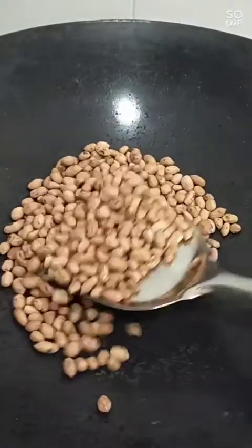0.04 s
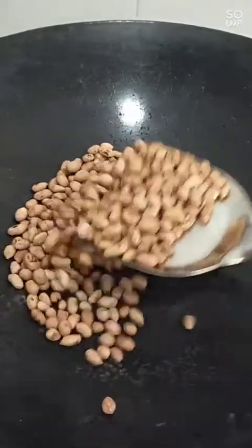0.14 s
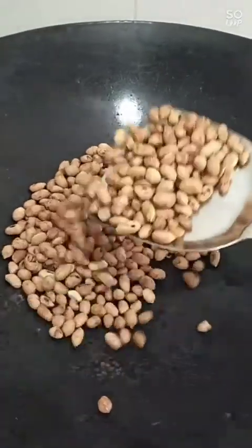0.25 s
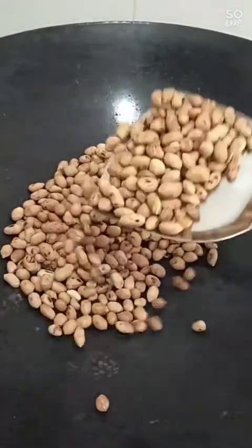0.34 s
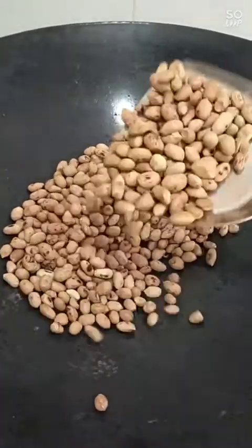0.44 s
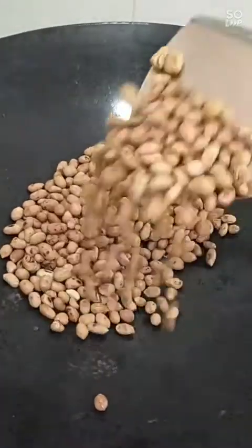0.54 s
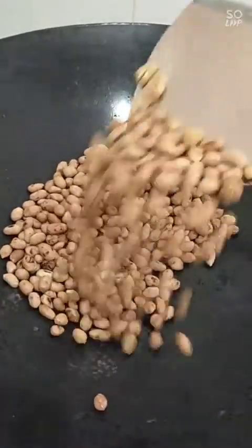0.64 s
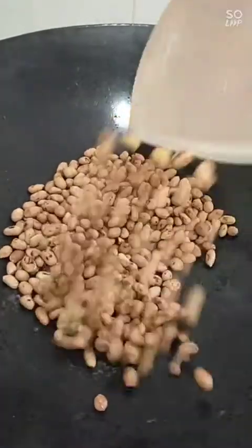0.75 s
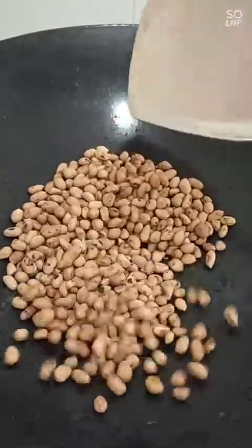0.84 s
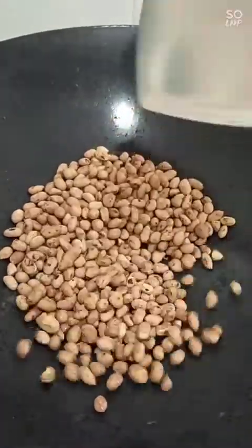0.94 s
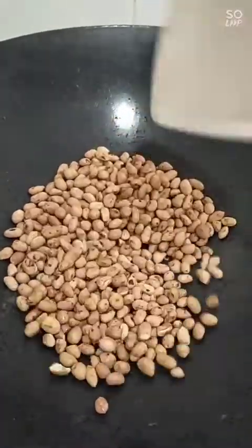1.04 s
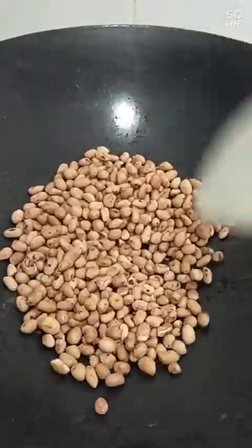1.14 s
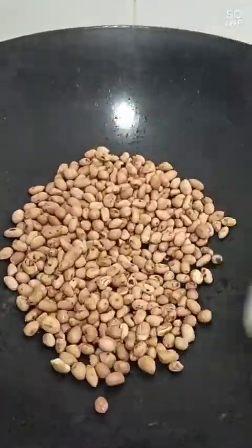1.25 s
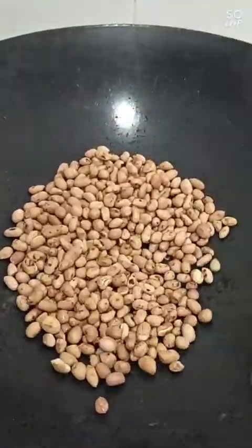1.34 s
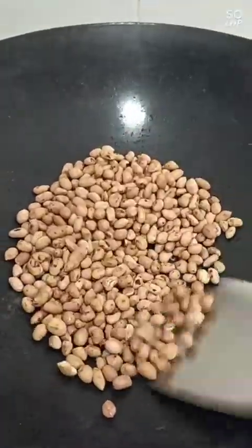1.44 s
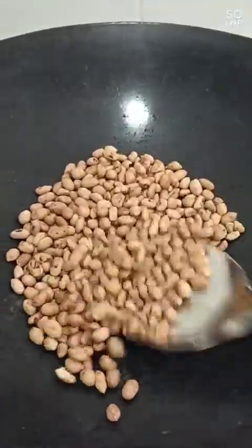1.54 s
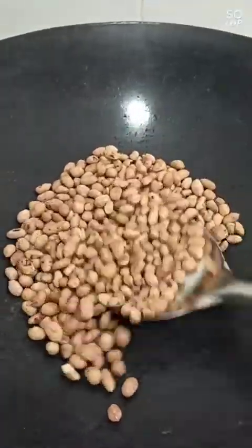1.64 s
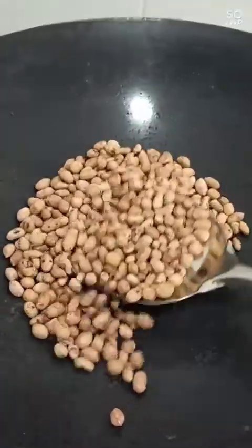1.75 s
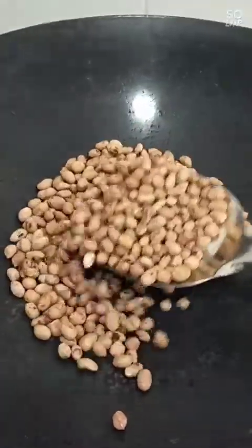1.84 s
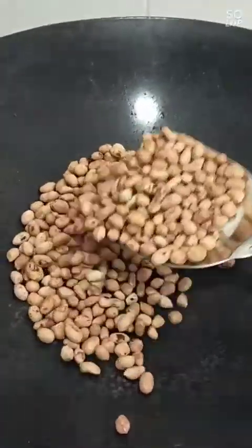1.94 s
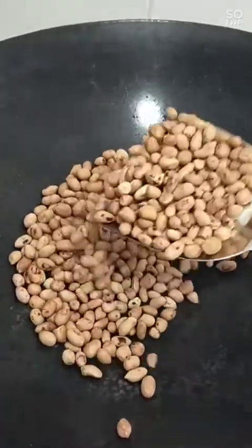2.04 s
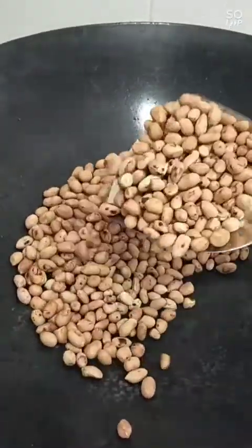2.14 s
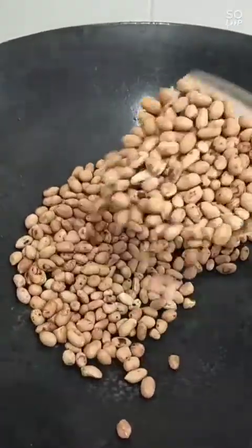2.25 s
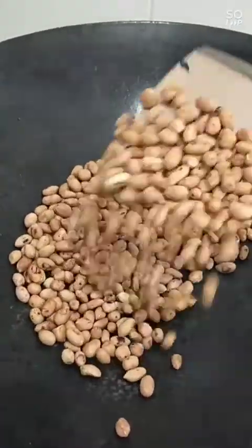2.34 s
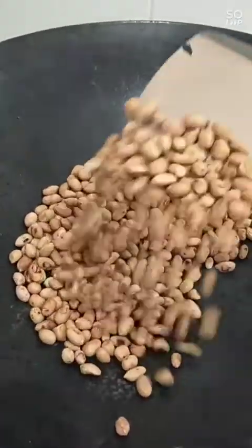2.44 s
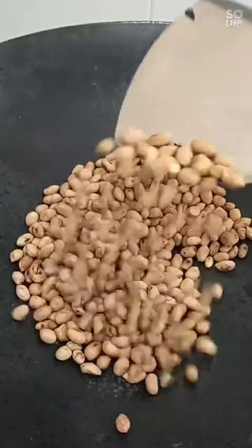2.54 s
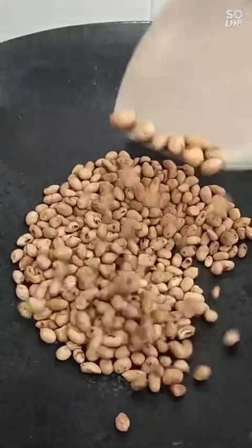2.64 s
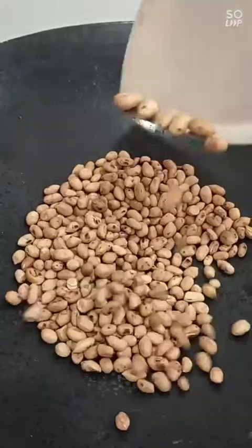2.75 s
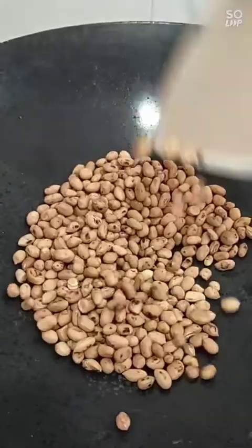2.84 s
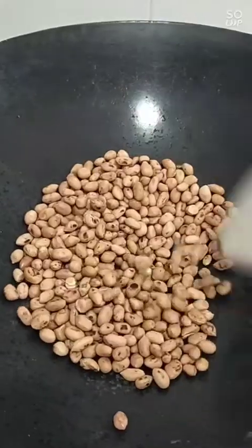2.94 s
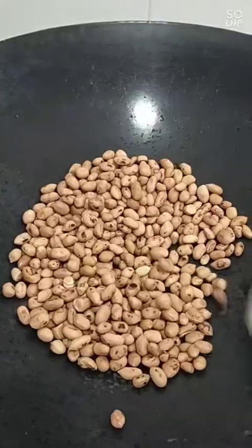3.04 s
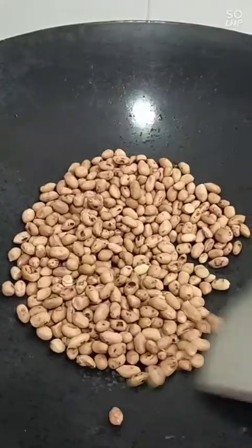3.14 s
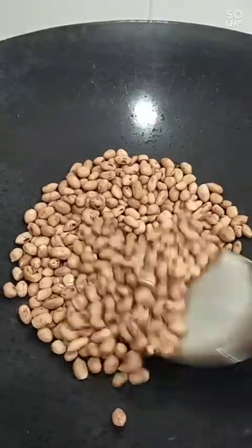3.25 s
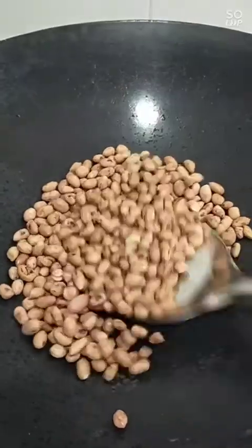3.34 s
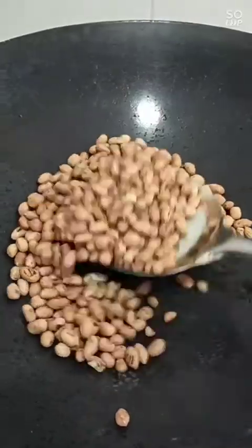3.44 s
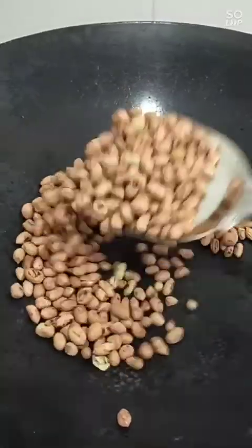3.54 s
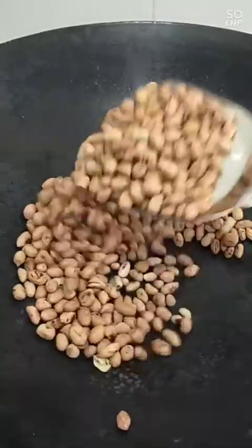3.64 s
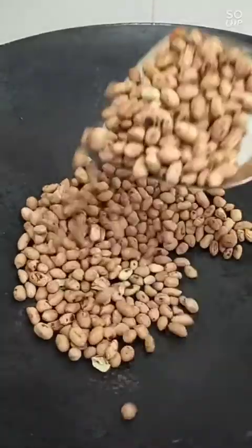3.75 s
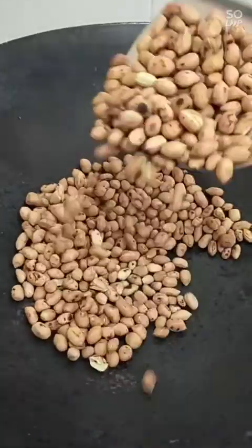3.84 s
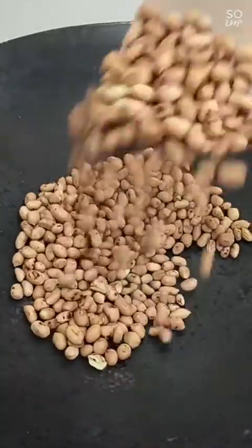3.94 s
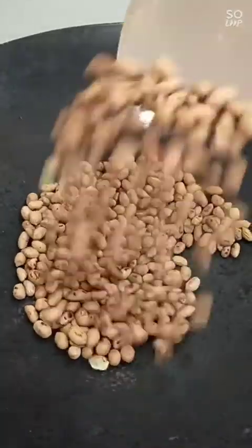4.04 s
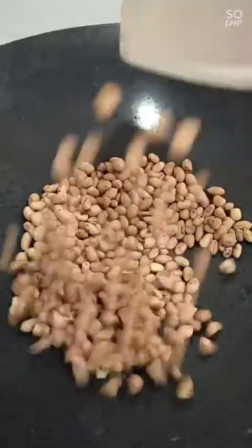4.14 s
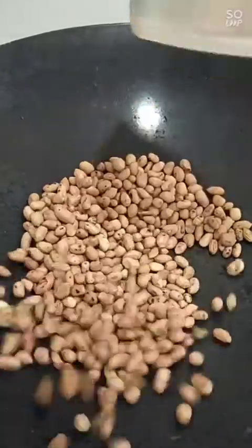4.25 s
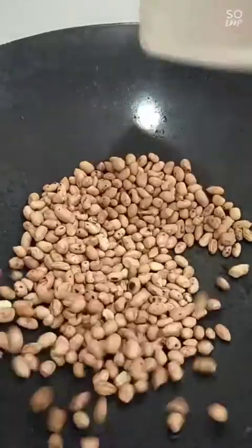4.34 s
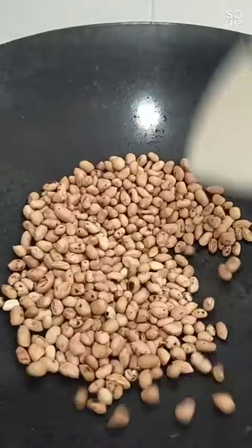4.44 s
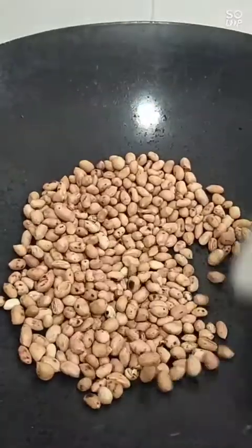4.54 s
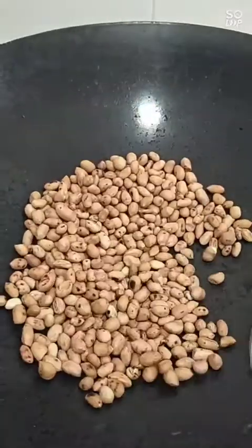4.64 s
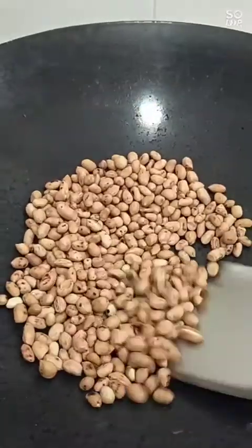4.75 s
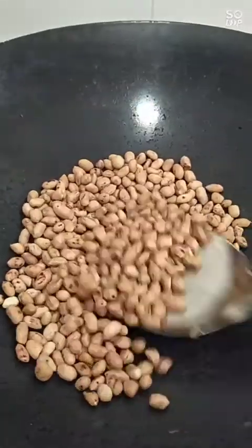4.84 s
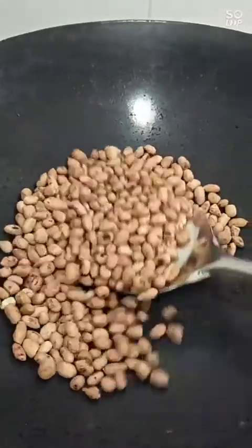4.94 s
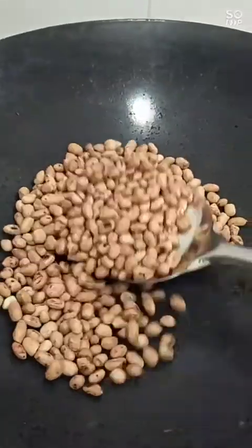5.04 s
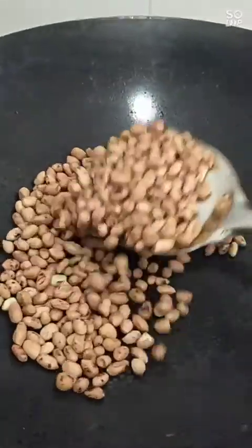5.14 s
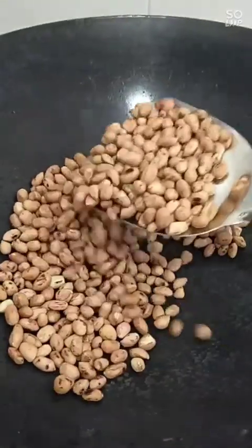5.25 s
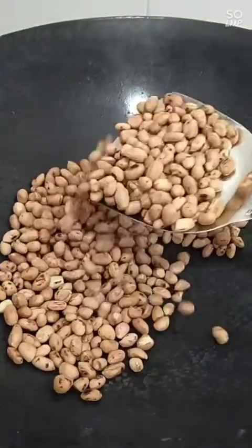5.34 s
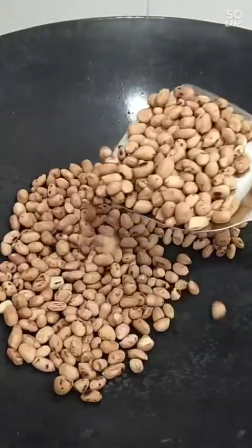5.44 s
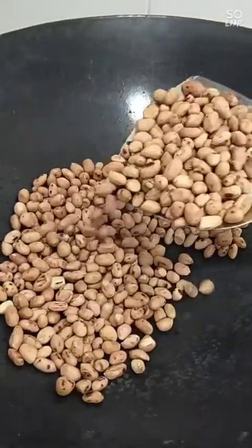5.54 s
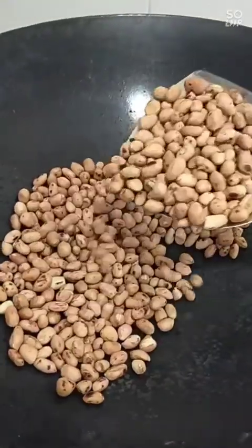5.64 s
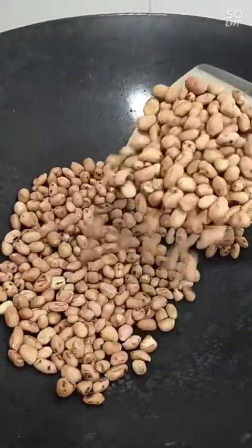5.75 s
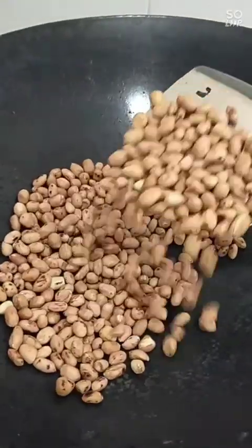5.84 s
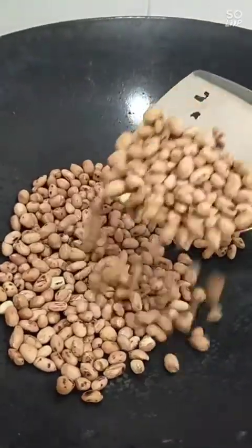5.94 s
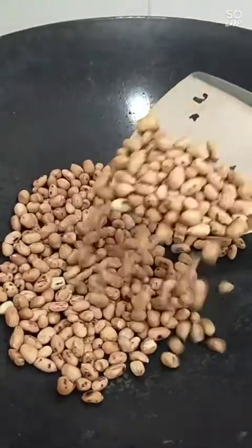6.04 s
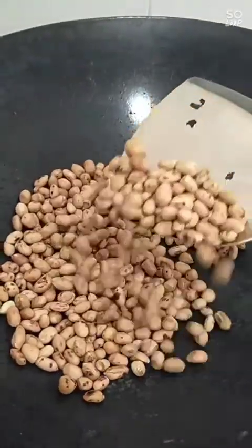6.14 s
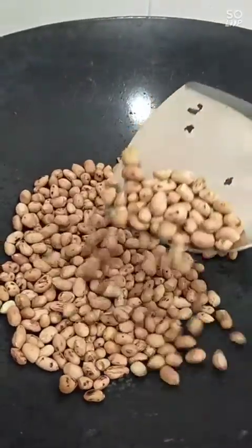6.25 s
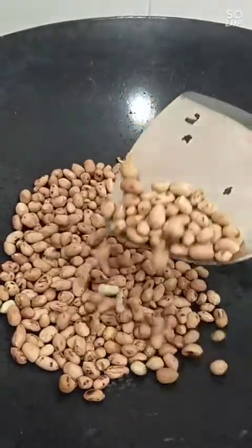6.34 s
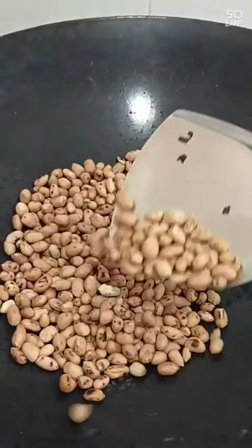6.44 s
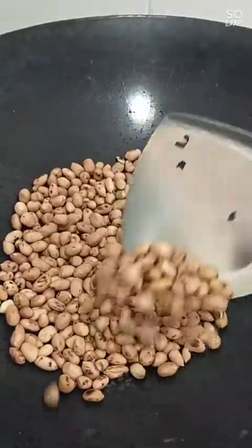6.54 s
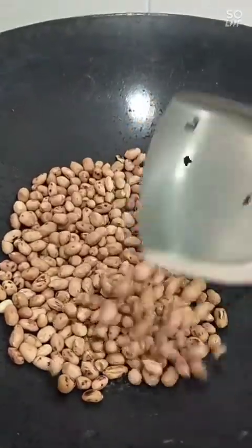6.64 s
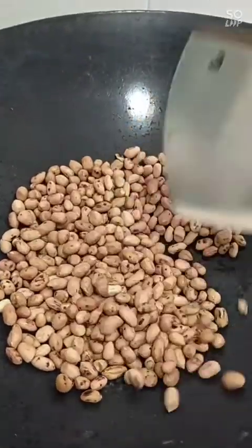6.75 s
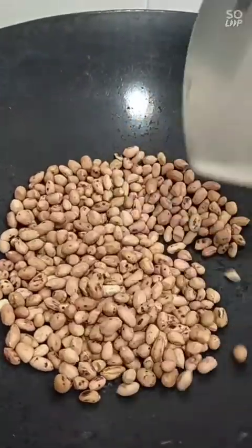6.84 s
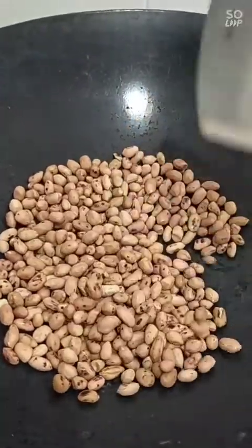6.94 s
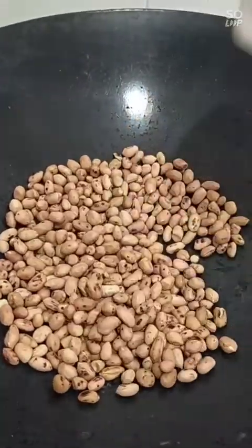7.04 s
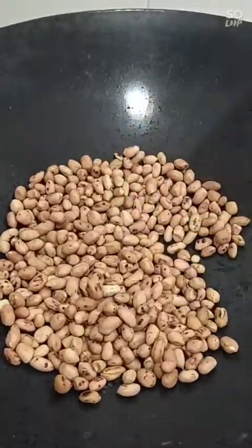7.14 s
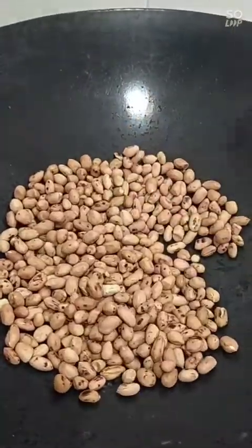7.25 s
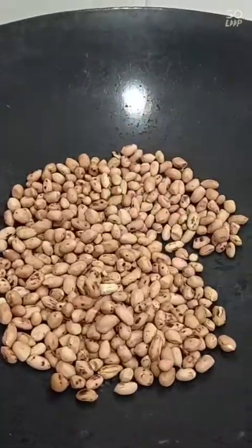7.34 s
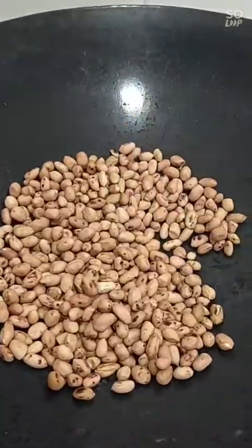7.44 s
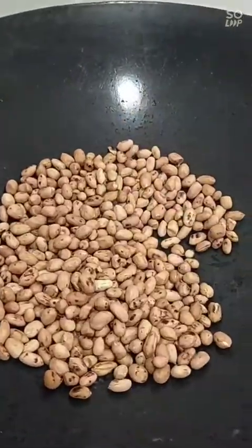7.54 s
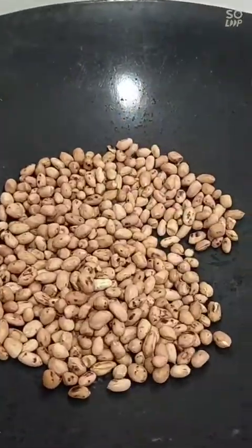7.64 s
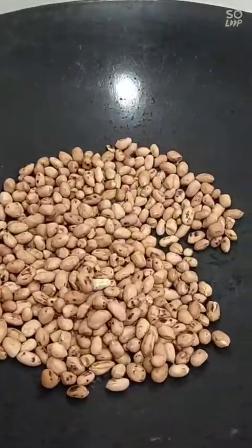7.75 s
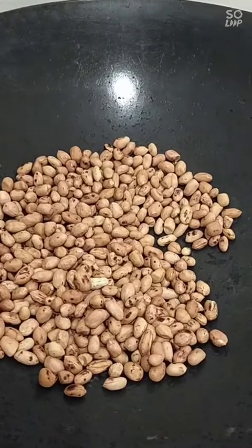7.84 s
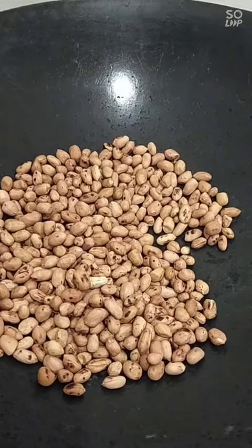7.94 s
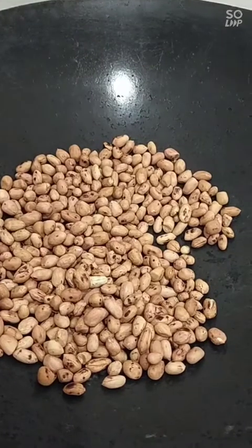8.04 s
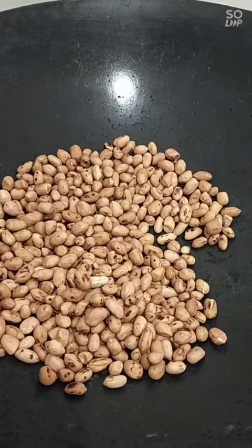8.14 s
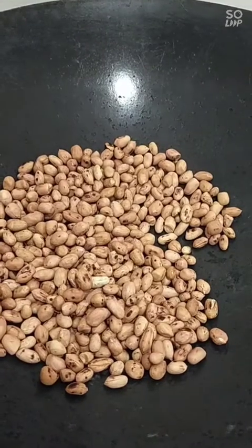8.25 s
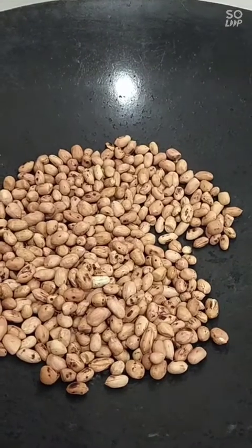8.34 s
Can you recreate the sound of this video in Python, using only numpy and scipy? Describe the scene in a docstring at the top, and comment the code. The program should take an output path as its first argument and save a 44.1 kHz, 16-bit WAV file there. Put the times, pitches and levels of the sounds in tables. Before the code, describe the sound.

A sharp, bright pop opens the sound, close up in a hard, echoing kitchen. Peanuts tick lightly in a steel wok as a spatula lifts them, with a faint metallic ring; at 0.5-0.85 s they rattle down onto the steel. Short gritty scrapes come at 1.3-1.55 s, then another pouring clatter around 2.3-2.6 s. A harder knock and longer scrape fill 3.05-3.3 s, a dense shower of nuts falls at 4.0-4.25 s, and the blade knocks and scrapes again at 4.6-4.85 s. Crisp pops crackle irregularly throughout, clustering at 4.4-4.7 s. A low microphone bump lands at 5.4 s. A softer, longer spill runs 5.8-6.4 s, with a last small clatter at 6.6 s. Then stirring stops and frequent dry pops continue to the end at about 8.4 s, some briefly ducking the level. Soft low thuds, roughly every 0.4 s, and faint air noise lie beneath.

```python
"""A sharp pop opens the scene: hot peanuts in a steel wok, close to a small microphone in a hard-walled kitchen.
Bursting skins are tiny scraps of noise; tumbling nuts are random blows that tick and set the steel ringing.
A spatula hisses as it scrapes (dense tiny slips) and sings when knocked (fading tones).
Behind them lie soft low thuds (dull noise), the echoing kitchen (a dying noise tail) and faint air noise.
The whole level dips now and then for about a tenth of a second, mostly around a pop."""
import sys
import numpy as np
from scipy import signal
from scipy.fft import rfft, irfft
from scipy.io import wavfile
from scipy.ndimage import uniform_filter1d

SR = 44100
rng = np.random.default_rng(int(sys.argv[2]) if len(sys.argv) > 2 else 0)


def generate_wav(signal):
    """Clip the signal to [-1, 1] and save it as 16-bit WAV at the path in sys.argv[1]."""
    frames = np.transpose(np.atleast_2d(signal))
    scaled = np.clip(frames, -1, 1) * 32767
    pcm = np.round(scaled).astype(np.int16)
    wavfile.write(sys.argv[1], SR, pcm)


N = 369999  # length of the scene in samples

# Levels in the tables are relative: mixing gains, filters and the room come on top.

# skins bursting: (time [s], level of the snap [dB], level of the nut's body against the snap [dB])
POPS = [(0.0094, -24.5, -25), (0.45, -36, -27), (0.854, -25, -21.5), (0.9762, -29.5, -26),
        (1.037, -23, -24.5), (1.3003, -27.5, -18.5), (1.6596, -33, -20.5), (2.0722, -43, -22),
        (2.1057, -21, -23.5), (2.6907, -37, -14), (3.0691, -22, -13.5), (3.1585, -19.5, -31),
        (3.284, -19.5, -14), (3.7584, -34.5, -23), (3.883, -33.5, -15), (4.2019, -23.5, -13.5),
        (4.4284, -21.5, -24.5), (4.4463, -21, -28), (4.5403, -17, -23), (4.616, -28, -21),
        (4.672, -27.5, -22), (4.707, -35, -18.5), (5.3867, -20, -25), (5.5188, -26, -30),
        (5.6342, -45.5, -14), (5.7554, -19, -21.5), (5.8642, -23, -18), (5.995, -35, -16),
        (6.57, -22.5, -20), (6.6422, -23, -24), (6.7427, -23, -26), (6.8503, -17, -20),
        (6.9733, -24.5, -27.5), (7.0598, -47, -12.5), (7.1301, -27, -20.5), (7.2247, -20.5, -23.5),
        (7.2706, -19.5, -23.5), (7.4645, -34.5, -17.5), (7.637, -18.5, -26), (7.66, -32, -18),
        (7.695, -36, -20.5), (7.759, -23.5, -26), (7.9342, -19.5, -24.5), (8.081, -26.5, -15.5),
        (8.1542, -17, -26.5), (8.2412, -24.5, -21.5), (8.248, -43.5, 0), (8.2549, -28, -23),
        (8.349, -41, -22.5)]
# echoes from the bowl, then the near wall: (delay [s], level [dB])
ECHOES = [(.0011, -9), (0.0028, -7), (0.013, -10.5), (0.0094, -17)]
# tone colour of the snap: (frequency [Hz], level [dB])
SNAP_COLOUR = [(1500, -66), (4500, -23.5), (8000, -8.5), (10500, -5), (12500, -4.5), (14000, 4.5),
               (15300, 8.5), (17000, -9.5)]
# tone colour of the nut's body: (frequency [Hz], level [dB])
NUT_COLOUR = [(200, -24), (1000, -12.5), (1700, -14.5), (2500, 4.5), (3900, -7), (6000, -9.5), (17000, -54)]
LAG_S = .001  # each burst comes this long after its time in the table
WALLS_DB = -8  # share of each pop sent to the walls


def pops():
    """A skin tears within about a millisecond: a bright snap and a duller body; far walls get plain coloured clicks."""
    s, db, body_db = np.transpose(POPS)
    snaps = np.c_[s + LAG_S, db + 6]
    bodies = np.c_[s + LAG_S, db + body_db + 20]
    snap = bursts(snaps, decay_s=0.00012, length=64, lead=5.0)
    body = bursts(bodies, decay_s=.0003, length=64, lead=2.17)
    for echo in ECHOES:  # uneven surfaces scatter each echo into a new shape
        snap += bursts(snaps + echo, decay_s=0.00023, length=96, lead=1.6)
        body += from_db(-6) * bursts(bodies + echo, decay_s=0.00059, length=96)
    near = colour(snap, SNAP_COLOUR) + colour(body, NUT_COLOUR)
    far = colour(clicks(snaps, extra_db=WALLS_DB), SNAP_COLOUR)
    far += from_db(-8) * colour(clicks(bodies, extra_db=WALLS_DB), NUT_COLOUR)
    return near, far


# the heap tumbles when scooped, carried or poured: (time of full strength [s], hold [s], rattle level [dB],
# build-up [dB/s], fall of the rattle [dB/s], level of the spatula's ring [dB])
TUMBLES = [(0.179, 0.011, -63, 86, 87, -61), (0.701, 0.056, -47, 131, 103, -84),
           (1.395, 0.04, -53.5, 250, 94, -66), (1.514, 0.044, -48.5, 154, 96, -59),
           (1.86, 0.11, -65, 100, 99, -65), (2.426, 0.043, -53, 162, 92, -77),
           (2.587, 0.08, -61, 100, 82, -73), (3.064, 0.071, -53.5, 396, 80, -77),
           (3.227, 0.05, -52, 78, 63, -55.5), (3.665, 0.016, -60, 64, 75, -64.5),
           (4.06, 0.039, -53.5, 248.5, 101, -79.5), (4.153, 0.061, -46.5, 102.5, 128, -76),
           (4.762, 0.075, -48.5, 235, 107, -51.5), (5.09, 0.21, -64, 58, 81, -75),
           (5.942, 0.39, -62.5, 80, 86, -80), (6.643, 0.017, -55.5, 190, 203, -92)]
# single nuts and clumps landing on steel: (time [s], level [dB])
LANDINGS = [(0.188, -59), (0.5243, -38.5), (0.5826, -28), (0.7118, -30), (0.7726, -37), (0.8435, -39),
            (1.3882, -39), (1.4062, -31), (1.4345, -35), (1.5174, -29.5), (1.567, -35.5), (1.8642, -45),
            (2.1902, -41.5), (2.2952, -36), (2.402, -27.5), (2.4455, -27.5), (2.5187, -32), (2.989, -36),
            (3.0574, -26.5), (3.1774, -26.5), (3.2515, -32), (3.5913, -41), (3.6486, -40), (3.8445, -41.5),
            (4.0163, -30.5), (4.1363, -39), (4.2314, -27.5), (4.3979, -42), (4.6331, -35), (4.7451, -30),
            (5.1057, -41), (5.827, -41.5), (5.9035, -32), (5.9594, -42), (6.0721, -37.5), (6.1218, -37),
            (6.2367, -37.5), (6.354, -33), (6.5928, -33)]
# ringing tones of the wok: (frequency [Hz], level [dB], time to fade by 60 dB [s])
WOK_MODES = [(2755, -11, .06), (3000, -14, .03), (3270, -2, .08), (3310, -1, .085), (3385, -3, .07),
             (3450, -5, .06), (3533, -5, .06), (3610, -3, .09), (3667, -4, .07), (3751, -5, .08),
             (3817, -7, .07), (3946, -8, .07), (4139, -15, .06), (4610, -19, .06)]
# ringing tones of the bowl: (frequency [Hz], level [dB], time to fade by 60 dB [s])
BOWL_MODES = [(492, -0.66, 0.042), (560, -0.7, 0.071), (646, -1.3, 0.088), (740, -1.1, 0.063),
              (887, -0.39, 0.041), (1040, 1, 0.032), (1221, -2.3, 0.04)]
# ringing tones of the spatula, also used by scrape and knocks:
# (frequency [Hz], level [dB], time to fade by 60 dB [s])
SPATULA_MODES = [(1242, 0, 0.23), (2359, -0.5, 0.048), (2400, -2.5, 0.052), (2680, -25, 0.035),
                 (4580, -11, .05), (5330, -8.5, 0.14), (5810, -7, 0.075), (6270, -7, 0.073),
                 (7680, -10, 0.025), (8320, -4.5, 0.034), (14600, -13, .006)]
# tone colour of nuts ticking: (frequency [Hz], level [dB])
TICK_COLOUR = [(300, -15), (1500, -36.5), (2300, 4), (3400, 1.5), (5500, -17), (8000, -18.5), (11500, -25),
               (15000, -8.5), (17000, -61)]
STILL_DB = -104.5  # rattle of the heap at rest
# drumming of the bowl at a rattle of -48.5 dB; share of the rattle's swing (in dB) that it follows
BOWL_DB, BOWL_FOLLOWS = -63, 0.5
BLADE_DAMPING = 1.44  # the spatula's ring falls this many times faster than the rattle
CLUMPING_DB = 2.0  # nuts move in clumps, so the rattle flickers
CONTACT_HZ = 5000  # a nut is soft: its blow on steel is dull above this


def nuts():
    """Tumbling nuts tick against each other and set the wok, the bowl and the loaded spatula ringing."""
    start, hold, db, rise, fall, blade_db = np.transpose(TUMBLES)
    rattle = swells(start, hold, db, rise, fall) + from_db(STILL_DB)
    spatula = swells(start, hold, blade_db, rise, BLADE_DAMPING * fall)
    bowl = from_db(BOWL_DB) * (rattle / from_db(-48.5)) ** BOWL_FOLLOWS
    rattle = rattle * flutter(depth_db=CLUMPING_DB, step=500)

    touches = grains(per_s=700., spread_db=5.0)
    ticks = grains(per_s=2000., spread_db=4.5)
    landed = clicks(LANDINGS)

    struck = from_db(-24.5) * ring(touches * rattle, WOK_MODES, spread_db=4.5)
    struck += from_db(-9.5) * ring(landed, WOK_MODES, spread_db=0.5)
    soft_blow = signal.butter(2, [1500, CONTACT_HZ], "band", fs=SR, output="sos")
    wok = signal.sosfilt(soft_blow, struck)

    landing_noise = bursts(LANDINGS, decay_s=0.0081, length=600)
    ticking = colour(from_db(-4.5) * ticks * rattle + from_db(3.5) * landing_noise, TICK_COLOUR)

    blade_touches = from_db(-19.5) * grains(per_s=1500., spread_db=4.0) * spatula
    # soft nuts reach only lower modes of the blade
    blade = ring(blade_touches, SPATULA_MODES[1:4], spread_db=3.0)
    drum = from_db(-28.5) * ring(touches * bowl + from_db(-5.0) * landed, BOWL_MODES, spread_db=5.0)
    return wok + ticking + blade + drum + from_db(-22) * clacks(rattle)


def clacks(rattle):
    """Nut on nut: lone dry clacks, each briefly ringing at one of ten pitches."""
    hits = grains(per_s=300., spread_db=3.0) * rattle
    dealt = rng.integers(0, 10, N)  # which pitch each hit gets
    out = np.zeros(N)
    for k, hz in enumerate(np.geomspace(2000, 4600, 10)):
        out += ring(hits * (dealt == k), [(hz, 0, 23.0 / hz)], spread_db=1.0)
    return out


# the steel edge bites or slides on steel: (time [s], hold [s], hiss level [dB])
SLIDES = [(0.016, 0.0016, -65.5), (0.108, 0.0052, -67), (1.305, 0.0046, -55), (1.386, 0.1, -56),
          (1.513, 0.035, -48), (3.054, 0.012, -49), (3.1, 0.19, -52.5), (4.621, 0.009, -51.5),
          (4.744, 0.11, -49)]
# tone colour of the scraping hiss: (frequency [Hz], level [dB])
HISS_COLOUR = [(1600, -19), (2500, 6.5), (4000, 5), (5400, -13), (7900, -8), (11600, -10.5), (15000, 5.5),
               (15800, -4), (16300, -37)]
BITE_DB_PER_S, LET_GO_DB_PER_S = 5993, 300


def scrape():
    """Dense slips of the edge hiss, catch and let go in each stroke, and stir the upper modes of the blade."""
    press = swells(*np.transpose(SLIDES), BITE_DB_PER_S, LET_GO_DB_PER_S)
    catching = flutter(depth_db=3.5, step=300)
    sliding = press > 2e-5  # silent under the lightest pressure
    slips = grains(per_s=9000., spread_db=3.0) * catching * press * sliding
    hiss = from_db(5) * colour(slips, HISS_COLOUR)
    return hiss + from_db(-36.0) * ring(slips, SPATULA_MODES[4:], spread_db=5.5)


# the spatula knocks the steel and sings: (time [s], level [dB], lowest mode against that level [dB])
KNOCKS = [(0.19, -52.5, -10), (0.4685, -57, -0.5), (0.525, -52, -10), (1.3117, -46.5, -20),
          (1.8612, -57.5, -10), (2.19, -59, -19), (2.309, -50, -13), (2.3608, -58.5, -4), (3.069, -37, -39),
          (3.6471, -54.5, -8), (3.9629, -61, -3), (4.6322, -38, -36), (5.6234, -66, -10), (6.593, -68, 4)]
KNOCK_T60_S, KNOCK_FLUTTER_DB = 0.25, 5  # time to fade by 60 dB; depth of the flutter


def knocks():
    """The three lowest modes of the free blade swell within milliseconds, flutter under the nuts and die away."""
    out, t = np.zeros((2, N + SR)), np.arange(SR) / SR
    low_hz, high_hz, twin_hz = [mode[0] for mode in SPATULA_MODES[:3]]
    low = np.sin(2 * np.pi * low_hz * t)
    high = np.sin(2 * np.pi * high_hz * t) + from_db(-12.5) * np.sin(2 * np.pi * twin_hz * t)
    for s, db, low_db in KNOCKS:
        fade = from_db(db - dip_db(s) - 60 * t / KNOCK_T60_S)
        shape = fade * (1 - np.exp(-t / 0.0022))
        first = int(s * SR)
        out[:, first:first + SR] += shape * np.array([high, from_db(low_db) * low])
    return sum(tone[:N] * flutter(KNOCK_FLUTTER_DB, step=320) for tone in out)


# a steady, slightly quickening beat, with fainter stray thuds between
FIRST_THUD_S, THUD_GAP_S, QUICKEN_S = .065, .38, .00022
THUD_DB, THUD_SPREAD_DB, STRAY_DB = -56.5, 2.5, -64.5


def thuds():
    """Soft, dull, uneven pushes, mostly below 300 Hz: slowly dying scraps of noise with the treble removed."""
    k = np.arange(23)
    beat = FIRST_THUD_S + THUD_GAP_S * k - QUICKEN_S * k ** 2
    chance = rng.standard_normal((len(k), 3))
    strays = beat[:-1] + THUD_GAP_S * rng.uniform(.3, .8, len(k) - 1)
    s = np.r_[beat + .006 * chance[:, 0], strays]
    beat_db = THUD_DB + THUD_SPREAD_DB * chance[:, 1]
    stray_db = STRAY_DB + 2 * THUD_SPREAD_DB * chance[:-1, 2]
    db = np.r_[beat_db, stray_db] + dip_db(s)  # the dips weaken thuds too
    pushes = bursts(np.c_[s, db], decay_s=0.043, length=6000)
    return from_db(27.5) * colour(pushes, [(25, -0.5), (105, 3.5), (250, -0.5), (600, -35)])


# how long the room rings: (frequency [Hz], time to fade by 60 dB [s])
ROOM_T60 = [(300, 0.87), (3000, 0.49), (8000, 0.51), (11000, 0.25), (15000, 0.56)]


def kitchen(x):
    """Hard walls give a dense noise tail, dying band by band, from 128 Hz to 16 kHz."""
    t = np.arange(SR // 2 + SR // 4) / SR
    tail = np.zeros(len(t))
    edges = 128 * 2 ** np.arange(0, 7.1, .5)  # half-octave bands
    for low, high in zip(edges, edges[1:]):
        band = signal.butter(4, [low, high], "band", fs=SR, output="sos")
        fade = from_db(-60 * t / at_hz(ROOM_T60, np.sqrt(low * high)))
        tail += signal.sosfilt(band, rng.standard_normal(len(t))) * fade
    tail *= np.clip((t - .002) / 0.0044, 0, 1)  # the tail fades in from 2 ms after each sound
    return signal.fftconvolve(x, tail / np.sqrt(np.sum(tail ** 2)))[:N]


# tone colour of the quiet air: (frequency [Hz], level [dB])
AIR_COLOUR = [(20, 1.5), (105, 1.5), (300, -12.5), (1000, -15.5), (1600, -21), (2500, -18), (3400, -25.5),
              (5800, -30), (8000, -35), (11800, -30), (15000, -18), (16300, -65.5)]
AIR_DB = -69.5


def air():
    """Steady, faint background noise with its own tone colour."""
    return from_db(AIR_DB) * rms_one(colour(rng.standard_normal(N), AIR_COLOUR))


# the level dips: (start [s], length [s], change of level [dB])
DIPS = [(.005, .098, -6), (1.027, .116, -5.5), (1.285, .101, -12), (1.652, .109, -17.5), (2.1, .1, -4.5),
        (4.424, .11, -5.5), (5.4179, .087, -25), (5.749, .109, -7), (6.967, .102, -12), (7.124, .097, -15),
        (7.263, .093, -9), (8.14, .097, -4.5)]


def dip_db(s):
    """Change of level in dB, zero or negative, at times s."""
    return sum(db * ((s >= start) & (s < start + length)) for start, length, db in DIPS)


def from_db(db):
    """Turn decibels into a plain gain."""
    return 10 ** (np.asarray(db) / 20)


def rms_one(x):
    """Scale a sound to an average (rms) strength of one."""
    return x / np.sqrt(np.mean(x ** 2) + 1e-20)


def at_hz(points, hz):
    """Read a (frequency, value) table between its points, on a log frequency scale."""
    table = np.array(points)
    return np.interp(np.log(hz + 1), np.log(table[:, 0]), table[:, 1])


def clicks(rows, extra_db=0):
    """One click for each row (time, level), raised to make up for the later dips."""
    s, db = np.transpose(rows)[:2]
    out = np.zeros(N)
    out[(s * SR).astype(int)] = from_db(db + extra_db - dip_db(s))
    return out


def bursts(rows, decay_s, length, lead=0.):
    """A fresh dying scrap of noise of unit energy for each row, after a leading click; makes up for the dips."""
    out = np.zeros(N + length)
    scraps = rng.standard_normal((len(rows), length)) * np.exp(-np.arange(length) / SR / decay_s)
    scraps[:, 0] += lead
    for (s, db), scrap in zip(rows, scraps):
        first = int(s * SR)
        out[first:first + length] += from_db(db - dip_db(s)) * scrap / np.sqrt(np.sum(scrap ** 2))
    return out[:N]


def grains(per_s, spread_db):
    """Random touches of uneven size and sign, at an average rate; rms 1."""
    sizes = from_db(spread_db * np.minimum(rng.exponential(1, N), 4)) * rng.choice([-1, 1], N)
    return rms_one(sizes * (rng.random(N) < per_s / SR))


def colour(x, spectrum):
    """Causal (minimum-phase) filter of unit energy with this tone colour."""
    gain = from_db(at_hz(spectrum, np.arange(4097) * SR / 8192))
    cepstrum = irfft(np.log(gain))
    cepstrum[1:4096] *= 2  # doubling this half packs the energy early
    pulse = irfft(np.exp(rfft(cepstrum[:4097], 8192)))[:4096]
    return signal.fftconvolve(x, pulse / np.sqrt(np.sum(pulse ** 2)))[:N]


def ring(x, modes, spread_db):
    """Every touch strikes each fading tone (mode) with a strength and sign of its own."""
    out, touched = np.zeros(N), np.flatnonzero(x)
    for hz, db, t60 in modes:
        r = from_db(-60 / (t60 * SR))  # fade per sample
        w = 2 * np.pi * hz / SR  # turn per sample
        strength = from_db(db + spread_db * rng.standard_normal(len(touched)))
        blows = np.full(N, 1e-18)
        blows[touched] = x[touched] * strength * rng.choice([-1, 1], len(touched))
        out += signal.lfilter([0, np.sin(w)], [1, -2 * r * np.cos(w), r * r], blows)
    return out


def swells(start, hold, db, rise, fall):
    """Gain that builds up, holds and dies in straight dB slopes; powers add; makes up for dips at each start."""
    t = np.arange(0, N + 32, 32)[:, None] / SR
    before, after = np.maximum(start - t, 0), np.maximum(t - start - hold, 0)
    level = db - dip_db(start) - rise * before - fall * after
    return np.interp(np.arange(N), t[:, 0] * SR, np.sqrt(np.sum(from_db(level) ** 2, axis=1)))


def flutter(depth_db, step):
    """Gain that wanders at random, with a new aim every step samples."""
    aims = np.arange(0, N + step, step)
    return from_db(depth_db * np.interp(np.arange(N), aims, rng.standard_normal(len(aims))))


def scene():
    """Pops and steel, their sound in the kitchen, the thuds and the quiet air."""
    near, far = pops()
    steel = nuts() + knocks() + scrape()
    room = kitchen(from_db(-11.5) * steel + far)
    return (near + steel + room + thuds() + air())[None]


# jolts in the microphone: (time [s], step [full scale = 1, before the overshoot is taken off])
JOLTS = [(5.4185, -.355), (7.131, .011)]
FAST_S, OVERSHOOT, SLOW_S = .045, .21, .27  # how a jolt dies away
PORT_HZ, PORT_WIDTH_HZ, PORT_LIFT = 7930, 1100, 0.97  # resonance of the microphone port
CUTOFF_HZ = 17200


def record(dry):
    """The port rings; a jolt shifts the resting point, which overshoots and creeps back; level dips; top is cut."""
    port = signal.iirpeak(PORT_HZ, PORT_HZ / PORT_WIDTH_HZ, fs=SR)
    dry = dry + PORT_LIFT * signal.lfilter(*port, dry)
    t = np.arange(N) / SR
    for s, step in JOLTS:
        since = np.maximum(t - s, 0)
        shift = np.exp(-since / FAST_S) - OVERSHOOT * np.exp(-since / SLOW_S)
        dry = dry + step * (t >= s) * shift
    level = from_db(uniform_filter1d(dip_db(t), size=120))  # soften the edges of the dips
    top_cut = signal.cheby2(12, 60, CUTOFF_HZ, fs=SR, output="sos")
    return signal.sosfilt(top_cut, dry * level)


dry = scene()
out = record(dry)
generate_wav(out)
```